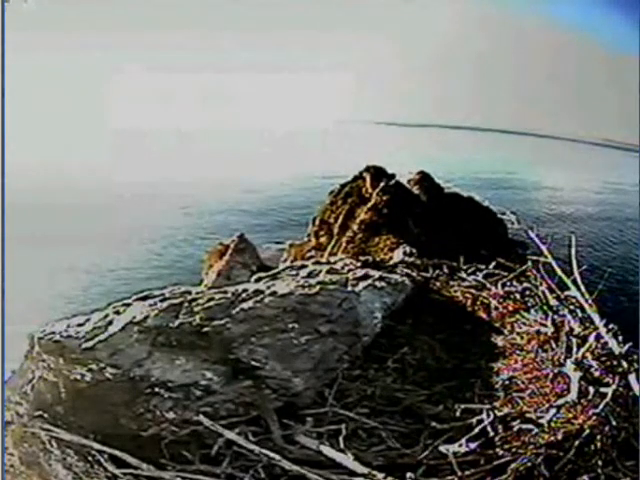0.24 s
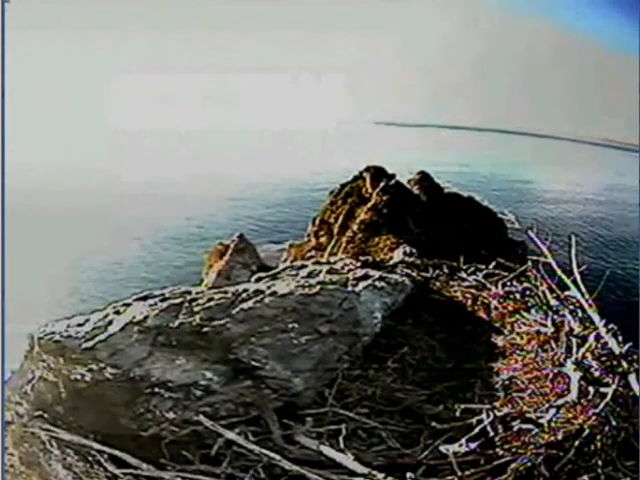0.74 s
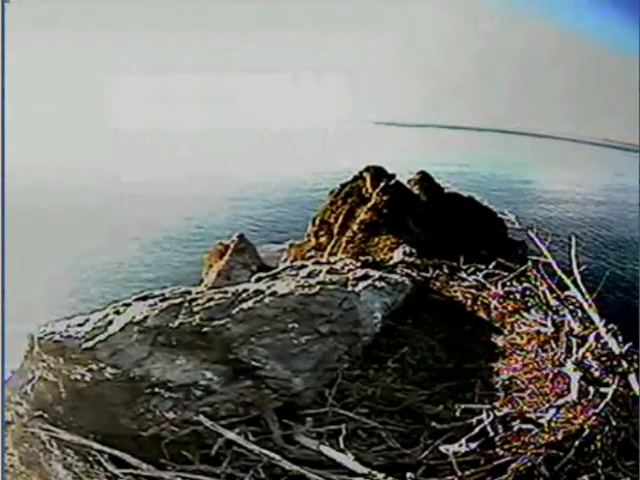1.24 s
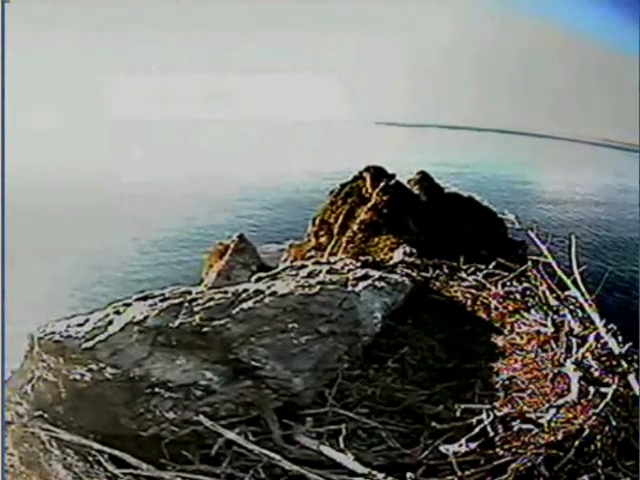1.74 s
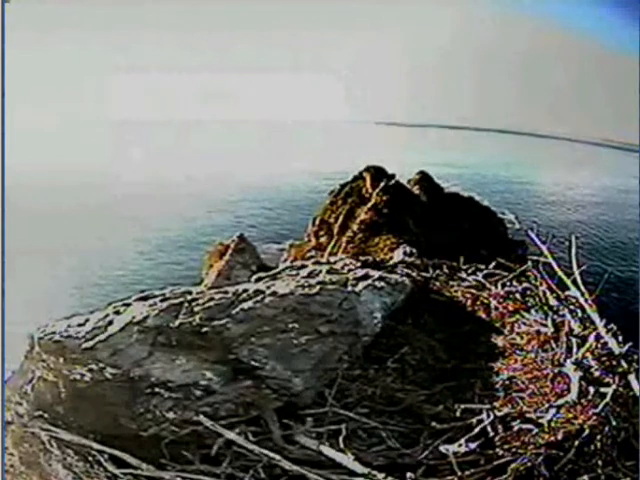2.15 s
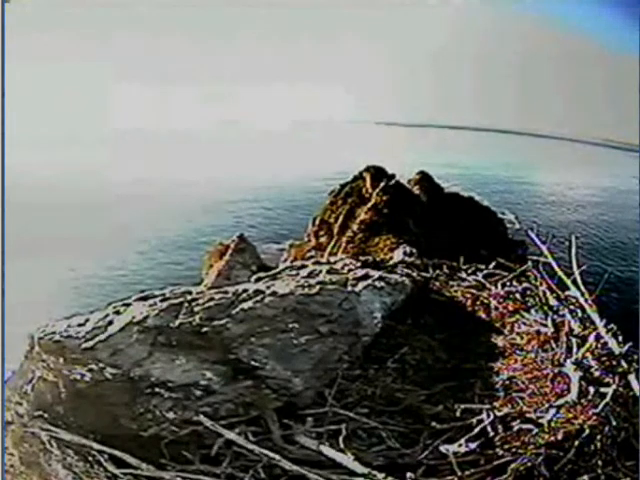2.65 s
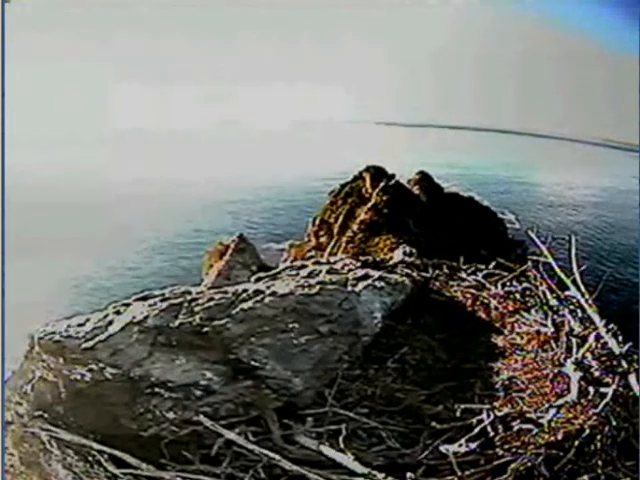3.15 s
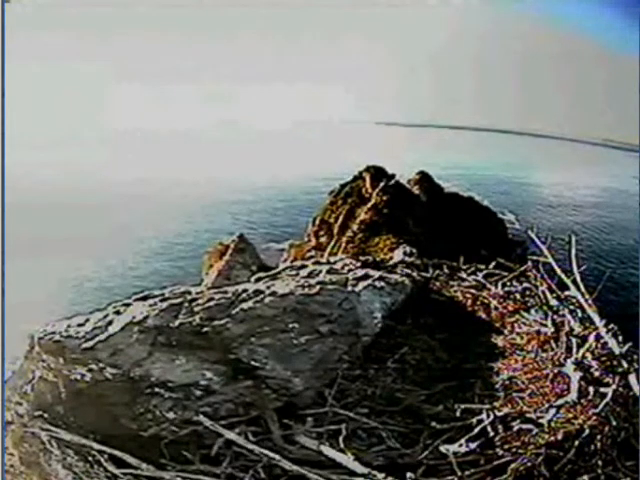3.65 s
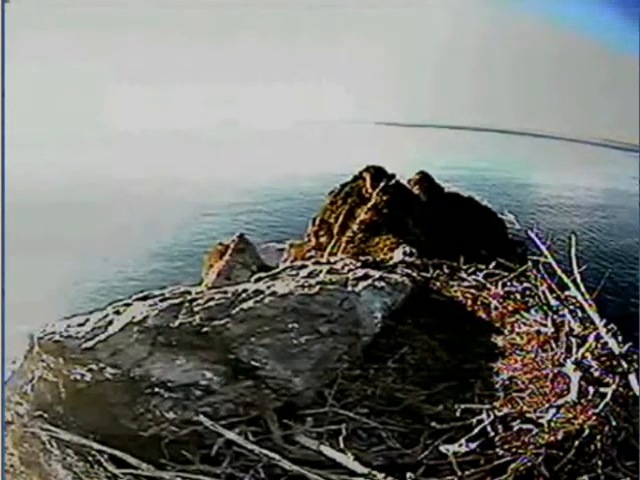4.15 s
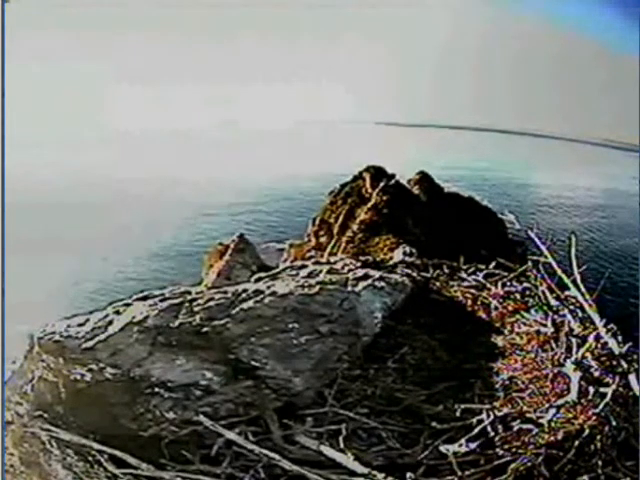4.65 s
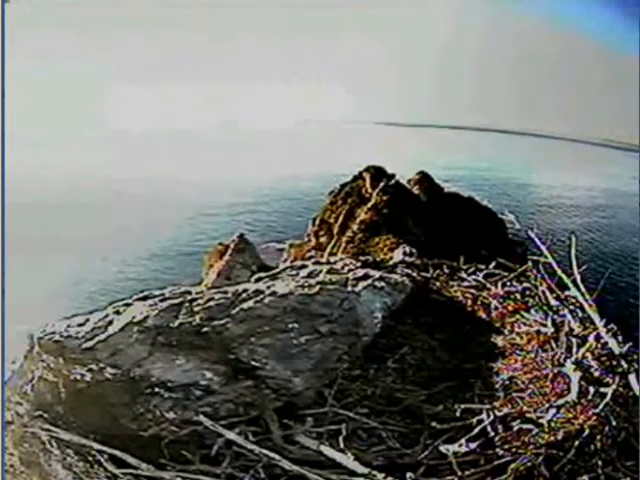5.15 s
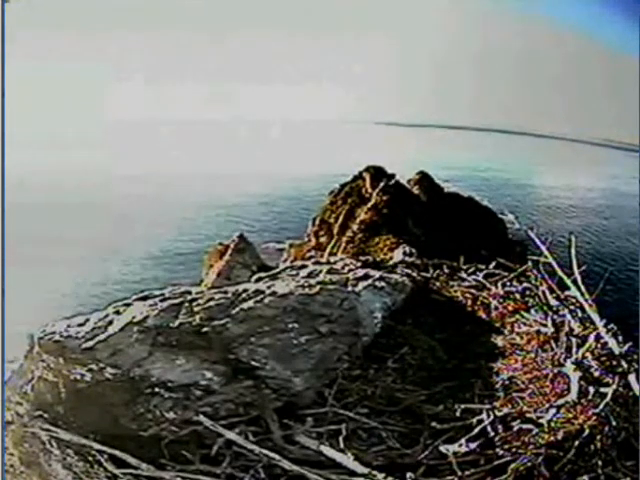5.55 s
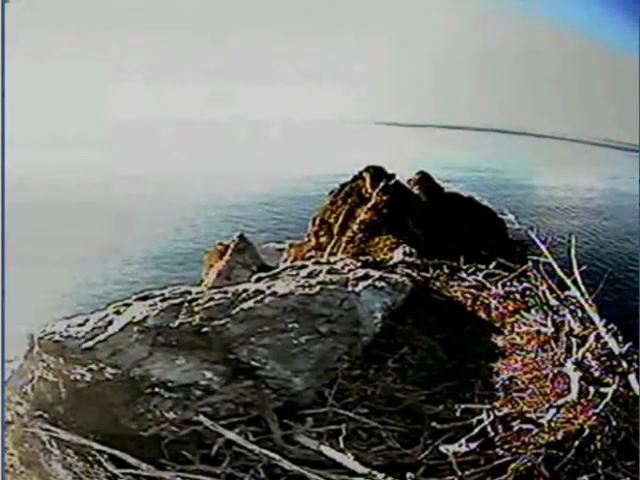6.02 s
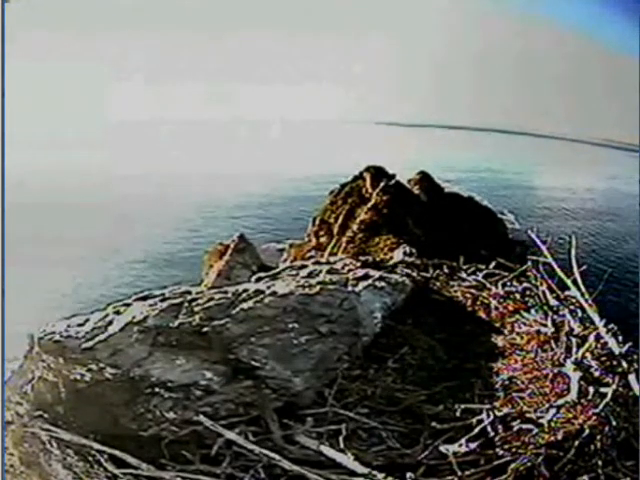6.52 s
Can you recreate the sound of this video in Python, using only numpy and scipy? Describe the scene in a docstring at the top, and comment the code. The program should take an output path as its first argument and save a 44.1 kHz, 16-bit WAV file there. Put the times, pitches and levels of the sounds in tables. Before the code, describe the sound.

A steady hiss of sea and wind runs throughout, heard through a small fixed microphone at an eagles' nest on a cliff, easing slightly toward the end. At about 0.4 seconds the microphone gives one brief, loud crackle. From 1.6 seconds the eagles give four short squealing calls, starting near 1.6, 2.3, 3.1 and 3.9 seconds, each about half a second or less. The voice breaks abruptly between a lower mewl, a reedy squeal and a high, nearly pure whistle. The first two calls are the loudest and rasp slightly in the microphone. After a pause, very short thin chirps come from 5.5 seconds, mostly in pairs, ending with a louder one at about 6.7 seconds. A small bird whistles very faintly far away during the first second, then near 4.3 and 6.3 seconds. The rock adds almost no echo.

```python
"""An eagles' nest on a sea cliff, heard through a small fixed camera microphone.
Sea and wind hiss throughout; a small bird whistles far off, at the start and now and then after.
Near 0.4 s the microphone's gain jumps once and throws the hiss up in a loud crackle.
From 1.6 s the eagles give four squealing calls, their syrinx membranes breaking between three
registers; the loudest notes overload the microphone. From 5.5 s short thin chirps follow in pairs."""
import sys
import numpy as np
from scipy import signal
from scipy.fft import rfft, irfft
from scipy.io import wavfile
from scipy.ndimage import uniform_filter1d

SR = 44100
rng = np.random.default_rng(int(sys.argv[2]) if len(sys.argv) > 2 else 0)


def wav_record(signal):
    """Record a signal, one row per channel, as 16-bit PCM in the file named by sys.argv[1]."""
    frames = np.transpose(np.atleast_2d(signal))
    bounded = np.clip(frames, -1, 1)
    # unit amplitude maps onto the largest positive 16-bit level
    quanta = np.round(bounded * 32767).astype(np.int16)
    wavfile.write(sys.argv[1], SR, quanta)


N = 298998


def gain_of(db):
    """Decibels to amplitude."""
    return 10 ** (np.asarray(db) / 20)


def unit_rms(x):
    """Scales to rms 1."""
    return x / np.sqrt(np.mean(x ** 2) + 1e-20)


def curve_at(points, hz):
    """Reads a curve on a log-frequency axis."""
    points_hz, values = np.transpose(points)
    return np.interp(np.log(hz + 1), np.log(points_hz + 1), values)


def add(mix, start_s, sound):
    """Mixes a sound in at its start time."""
    part = mix[round(start_s * SR):][:len(sound)]
    part += sound[:len(part)]


def low_pass(x, hz):
    """Steep low-pass."""
    return signal.oaconvolve(x, signal.firwin(801, hz, window=("kaiser", 8), fs=SR), "same")


def wander(rate_hz, size=SR):
    """Smooth random motion of rms 1, up to about the given rate."""
    hz = np.fft.rfftfreq(size, 1 / SR)
    return unit_rms(irfft(rfft(rng.standard_normal(size)) / (1 + (hz / rate_hz) ** 4), size))


# sea and wind as the microphone colours them: frequency_hz, relative_db
HISS_SPECTRUM = [(20, -1.5), (110, -10.5), (240, -11), (390, -8), (540, -10.5), (960, -5.5), (1220, 0),
                 (1400, -6.5), (1630, -16.5), (2200, -19), (2850, -16.5), (3140, -12.5), (3650, -30),
                 (7600, -30)]
# slow swell of the sea: time_s, level_db
SEA_SWELL = [(.28, -36), (.53, -38), (3.3, -36), (4.5, -38.5), (5.6, -39), (6.1, -41)]
def sea_and_wind(patchy_db=1.15, flicker_db=0.2, edge_hz=7624, skirt_db=-34.5, trim_db=1):
    """Patchy hiss around the cliff; its body follows the swell more than its rumble and treble do."""
    hop, window = 512, 2048
    frames, hz = N // hop + 5, np.fft.rfftfreq(window, 1 / SR)
    real, imaginary, patches = rng.standard_normal((3, frames, len(hz)))
    patches = uniform_filter1d(patches, size=7, axis=0)
    patches = unit_rms(uniform_filter1d(patches, size=14, axis=1))
    time_s, level_db = np.transpose(SEA_SWELL)
    swell_db = np.interp(np.arange(frames) * hop / SR, time_s, level_db - level_db.mean())
    swell_share = curve_at([(160, .09), (500, .87), (1200, .92), (3000, .93), (4000, .13)], hz)
    colour_db = curve_at(HISS_SPECTRUM, hz) + patchy_db * patches + swell_db[:, None] * swell_share
    spectra = (real + 1j * imaginary) * gain_of(colour_db)
    hiss = signal.istft(spectra.T, nperseg=window, noverlap=window - hop)[1][:N]
    hiss = low_pass(hiss, edge_hz) + gain_of(skirt_db) * hiss
    hiss *= gain_of(flicker_db * wander(rate_hz=5.3, size=N))
    return gain_of(level_db.mean() + trim_db) * unit_rms(hiss)


def electronic_fizz(low_hz=14400, high_hz=15800, level_db=-67.5):
    """Steady electronic noise in one narrow band at the top of hearing."""
    noise = rng.standard_normal(N)
    return gain_of(level_db) * unit_rms(low_pass(noise, high_hz) - low_pass(noise, low_hz))


def syrinx(hz, amplitude, jitter, shimmer_db, quaver=.002, waver_db=.5):
    """A bird's membranes vibrate with a fast shake and a slow waver: returns phase and envelope."""
    shake = jitter * wander(rate_hz=130) + quaver * wander(rate_hz=25)
    flutter_db = shimmer_db * wander(rate_hz=75) + waver_db * wander(rate_hz=14)
    phase = 2 * np.pi * np.cumsum(hz * (1 + shake[:len(hz)])) / SR
    return phase, np.sqrt(2) * amplitude * gain_of(flutter_db[:len(hz)])


def chirp_shape(start_s, length_s, first_hz, last_hz, level_db):
    """One lopsided swell on a straight glide: returns start, pitch and amplitude."""
    progress = np.linspace(0, 1, round(length_s * SR))
    swell = np.sin(np.pi * progress ** .78)  # rises faster than it fades
    return start_s, first_hz + (last_hz - first_hz) * progress, gain_of(level_db) * swell


def held_shape(start_s, length_s, first_hz, last_hz, turn_hz, first_db, last_db, push_db):
    """A held note settles, glides and bends on a last push of air: returns start, pitch and amplitude."""
    attack_s, release_s, scoop_s, turn_s = .016, .0051, .0096, .03
    t = np.arange(0, length_s + (attack_s + release_s) / 2, 1 / SR)
    left_s = t[-1] - t
    scoop = 1 + .018 * np.exp(-t / scoop_s)  # starts slightly sharp
    glide = .5 + .5 * np.tanh(5.5 * (t / t[-1] - .5))
    turn = np.clip(1 - left_s / turn_s, 0, 1) ** .88
    hz = (first_hz + (last_hz - first_hz) * glide + turn_hz * turn) * scoop
    level_db = first_db + (last_db - first_db) * glide + push_db * turn
    ramp = np.minimum(t / attack_s, left_s / release_s)
    gate = np.sin(np.pi / 2 * np.minimum(ramp, 1)) ** 2
    return start_s - attack_s / 2, hz, gate * gain_of(level_db)


# how the throat passes the octave of a high note: octave_hz, relative_db
THROAT_RESPONSE = [(4400, -43), (4660, -20), (4860, -27.5), (5400, -28), (5620, -20.5), (6400, -20),
                   (6900, -31.5), (9000, -61)]
def pure_notes(notes, shape, jitter, shimmer_db):
    """High notes: the membranes swing almost as a sine; the throat colours a faint octave."""
    voice = np.zeros(N)
    for row in notes:
        start_s, hz, amplitude = shape(*row)
        phase, envelope = syrinx(hz, amplitude, jitter, shimmer_db)
        octave = gain_of(curve_at(THROAT_RESPONSE, 2 * hz)) * np.sin(2 * phase)
        add(voice, start_s, envelope * (np.sin(phase) + octave))
    return voice


def reedy_notes(notes, third_db, fourth_db, jitter, shimmer_db=1, full_effort_db=-42):
    """Lower notes: the throat favours the octave, and the upper partials grow with effort."""
    voice = np.zeros(N)
    for *row, octave_db in notes:
        start_s, hz, amplitude = held_shape(*row)
        phase, envelope = syrinx(hz, amplitude, jitter, shimmer_db)
        octave_envelope = envelope * gain_of(octave_db)
        effort = np.minimum(octave_envelope / gain_of(full_effort_db), 1) ** .63
        upper = gain_of(third_db) * np.sin(3 * phase) + gain_of(fourth_db) * np.sin(4 * phase)
        overtones = octave_envelope * (np.sin(2 * phase) + effort * upper)
        add(voice, start_s, envelope * np.sin(phase) + overtones)
    return voice


# thin whistles in the distance: start_s, length_s, first_hz, last_hz, level_db
FAR_BIRD_NOTES = [ (0, 0.21, 5300, 5300, -63), (.5, 0.47, 5410, 5300, -67), (4.28, 0.56, 5500, 5220, -65.5),
                  (6.3, .42, 5520, 5200, -66)]
def far_bird():
    """A small bird far from the microphone, its whistles faint and fluttering."""
    return pure_notes(FAR_BIRD_NOTES, chirp_shape, jitter=.0069, shimmer_db=3.5)


def rock_ledge(voice, wet_db=-22, t60_s=.15):
    """The rock around the nest scatters a short, weak tail back to the microphone."""
    t = np.arange(SR // 4) / SR
    scatter = rng.standard_normal(len(t)) * gain_of(-60 * t / t60_s) * (t > .003)
    tail = signal.oaconvolve(voice, scatter / np.linalg.norm(scatter))[:N]
    return voice + gain_of(wet_db) * tail


# brief notes at the nest: start_s, length_s, first_hz, last_hz, level_db
CHIRP_NOTES = [ (1.560, 0.012, 2880, 2720, -25), (1.576, 0.013, 2870, 2900, -26),
               (1.621, 0.026, 2790, 2730, -41), (1.640, 0.045, 3270, 3010, -36.5),
               (2.323, 0.022, 2300, 2270, -39), (3.262, 0.021, 3230, 3100, -36),
               (4.045, .028, 3350, 3230, -41.5), (5.507, 0.019, 2714, 2660, -32),
               (5.527, 0.013, 3320, 3090, -41), (5.897, 0.012, 2900, 2700, -36),
               (5.910, 0.012, 3050, 3220, -41), (5.989, 0.032, 3300, 3480, -39.5),
               (6.300, 0.0086, 2880, 2800, -34), (6.310, .016, 2820, 2840, -43),
               (6.388, 0.021, 3280, 3340, -35), (6.405, 0.031, 3450, 3450, -36),
               (6.418, 0.024, 2920, 2880, -43), (6.715, 0.025, 2775, 2844, -26)]
def eagle_chirps():
    """Thin chirps, and the squeaks where the voice breaks."""
    return pure_notes(CHIRP_NOTES, chirp_shape, jitter=.0089, shimmer_db=.5)


# low register: start_s, length_s, first_hz, last_hz, turn_hz, first_db, last_db, push_db, octave_db
MEWL_NOTES = [ (2.288, 0.033, 1230, 1314, 4, -43, -42.5, 1, 4.5),
              (3.128, .138, 1283, 1296, 49, -42, -43, -1, 0),
              (3.925, 0.118, 1312, 1350, 34, -37.5, -36, -5, -5.5)]
def eagle_mewls():
    """The membranes vibrate at their slowest in the mewl that opens a call."""
    return reedy_notes(MEWL_NOTES, third_db=-16.5, fourth_db=-24, jitter=.0033)


# middle register: start_s, length_s, first_hz, last_hz, turn_hz, first_db, last_db, push_db, octave_db
SQUEAL_NOTES = [ (1.926, 0.072, 1900, 1890, -270, -51, -48.5, 10.5, 3.5),
                (2.343, .251, 1785, 1912, 52, -39, -47, 2, 1),
                (3.27, .178, 1846, 1950, 60, -49.5, -45.5, 2.7, -4),
                (4.05, .088, 1917, 1965, 43, -46, -42, 1, -9.5)]
def eagle_squeals():
    """The voice breaks into a reedy squeal with a strong third partial."""
    return reedy_notes(SQUEAL_NOTES, third_db=-10, fourth_db=-37.5, jitter=.002)


# high register: start_s, length_s, first_hz, last_hz, turn_hz, first_db, last_db, push_db
WHISTLE_NOTES = [ (1.686, 0.063, 3180, 3284, -5, -36.5, -34.5, 2),
                 (1.753, .171, 2435, 2312, -20, -26.5, -33, -8),
                 (2.595, 0.2075, 2420, 2422, -290, -27.5, -26.5, -4.5),
                 (3.507, 0.014, 2265, 2236, -62, -31, -31, -1),
                 (4.14, 0.062, 2370, 2375, -230, -37, -37.5, 5)]
def eagle_whistles():
    """The nearly pure top of a call, the loudest register at the microphone."""
    return pure_notes(WHISTLE_NOTES, held_shape, jitter=.0022, shimmer_db=0)


def scene():
    """The eagles on their ledge and a far bird, over the hiss."""
    eagles = eagle_whistles() + eagle_chirps() + eagle_squeals() + eagle_mewls()
    return (far_bird() + rock_ledge(eagles) + sea_and_wind() + electronic_fizz())[None]


def record(dry):
    """The microphone's amplifier rasps on loud notes; its gain jumps once, so hiss and offset crackle."""
    offset, overload_level, band_limit_hz = .0069, .087, 15850
    jump_start_s, jump_end_s, jump_db = .3628, .3857, 22.7
    t = np.arange(N) / SR
    overloaded = np.clip(dry[0] + offset, -overload_level, overload_level)
    jump = uniform_filter1d(1. * ((t > jump_start_s) & (t < jump_end_s)), size=8)
    return low_pass(overloaded * gain_of(jump_db * jump), band_limit_hz)[None]


dry = scene()
out = record(dry)
wav_record(out)
```